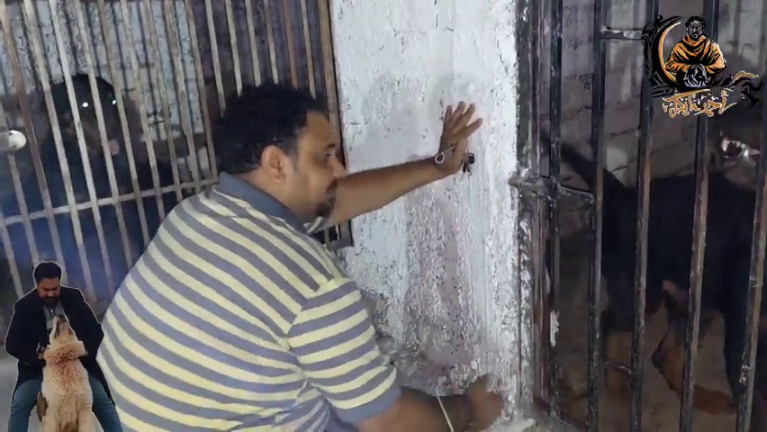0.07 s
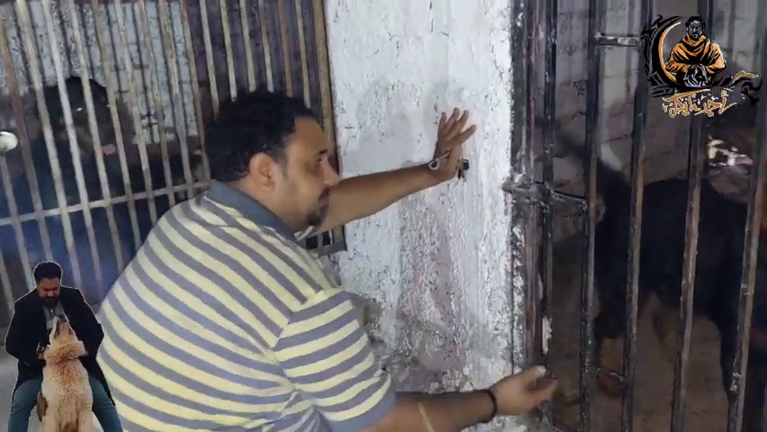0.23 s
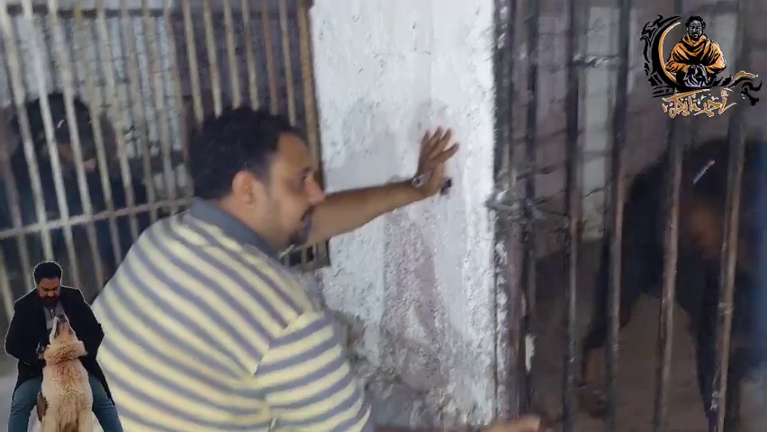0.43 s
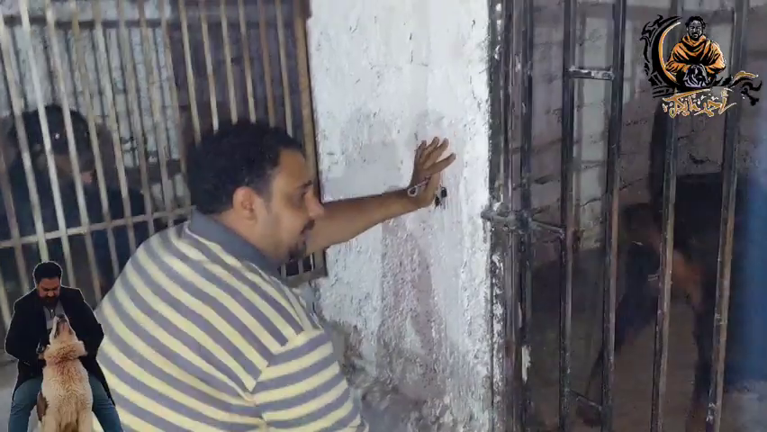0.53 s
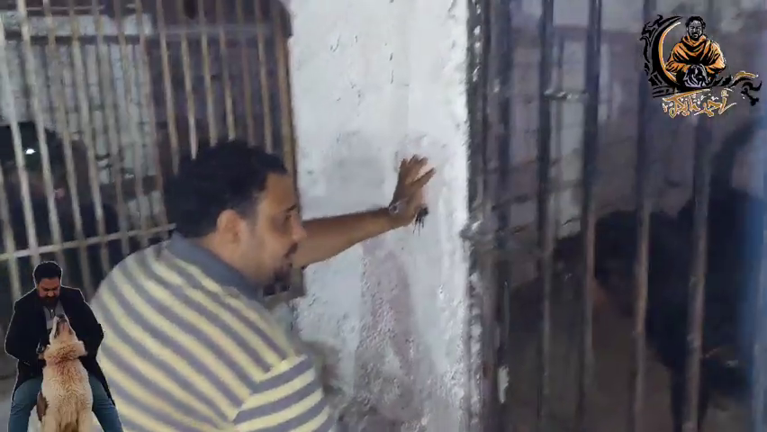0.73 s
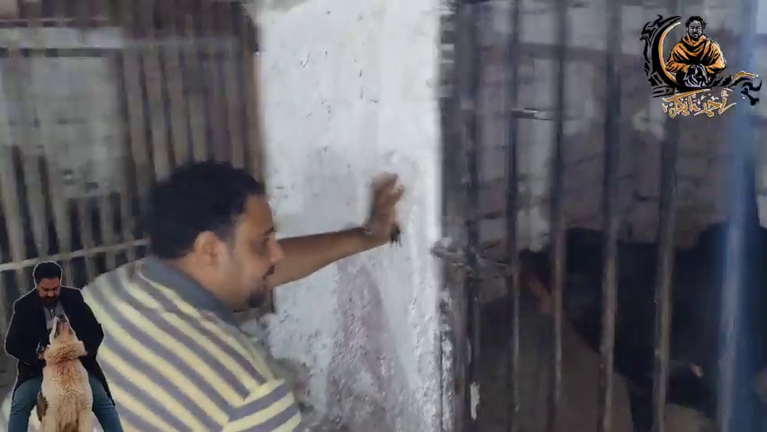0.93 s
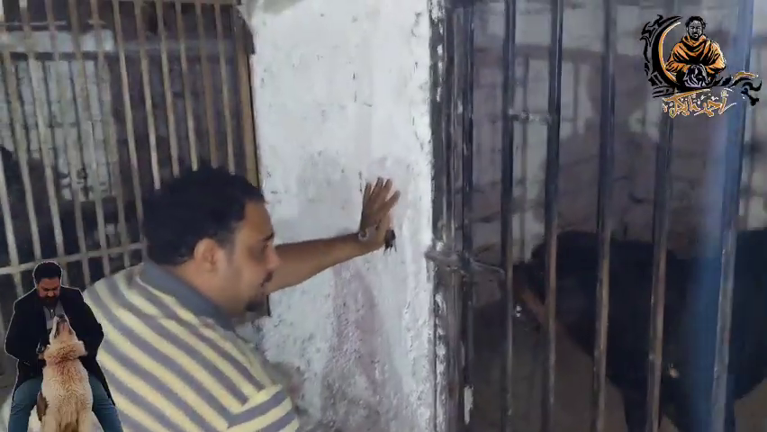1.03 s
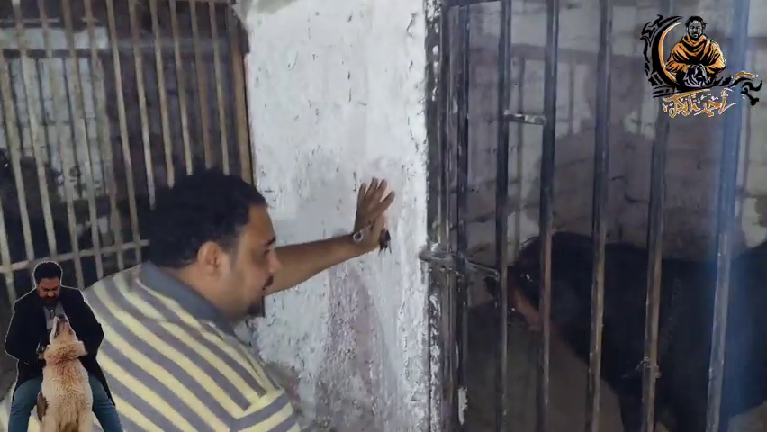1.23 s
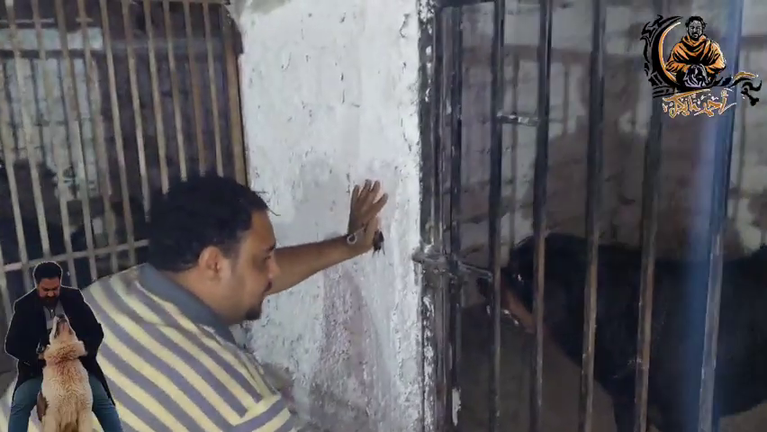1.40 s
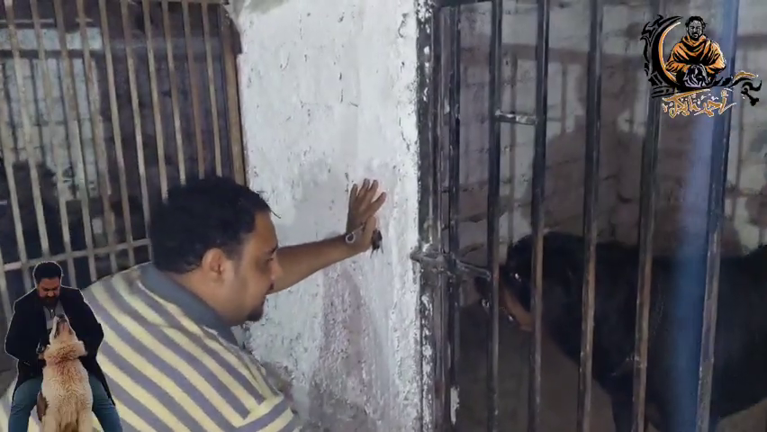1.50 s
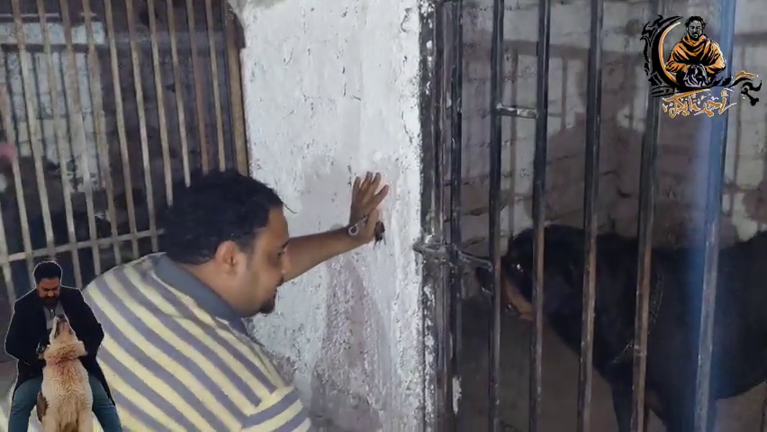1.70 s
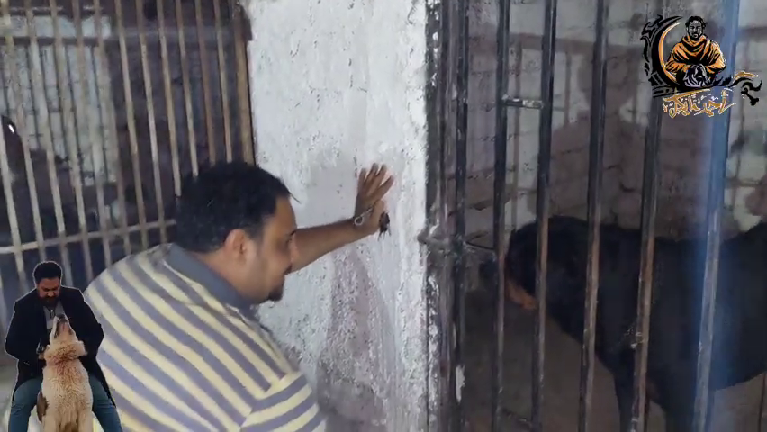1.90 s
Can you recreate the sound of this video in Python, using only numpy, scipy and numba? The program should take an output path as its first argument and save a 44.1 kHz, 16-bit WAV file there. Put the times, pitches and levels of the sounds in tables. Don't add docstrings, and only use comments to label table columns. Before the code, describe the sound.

Three loud, throaty barks from a large dog close by, at about 0.36, 0.6 and 0.87 seconds, each under a quarter second, ringing in a bare hard-walled kennel. Before them, distant dogs yelp over a low growl and a claw tap. Collar tags tinkle faintly between barks. A whistling pant comes near 1.15, a far bark around 1.3 to 1.5, then soft pants from 1.73 over quiet, sinking room rumble and phone hiss.

```python
import sys
import numpy as np
from scipy import signal
from scipy.io import wavfile
from scipy.ndimage import uniform_filter1d
from numba import njit

SR = 44100
rng = np.random.default_rng(int(sys.argv[2]) if len(sys.argv) > 2 else 0)


def gain_from_decibels(decibels):
    exponent = np.asarray(decibels, float) / 20
    return 10 ** exponent


def int16_out(signal):
    q = np.round(np.clip(np.atleast_2d(signal).T, -1, 1) * 32767)
    wavfile.write(sys.argv[1], SR, q.astype(np.int16))


N = 85995


def unit(x):
    return x / np.sqrt(np.mean(x ** 2) + 1e-30)


@njit
def svf(x, hz, width):
    y, b, l = np.empty(len(x)), 0., 0.
    for i in range(len(x)):
        g, k = np.tan(np.pi * hz[i] / SR), width / hz[i]
        v = (b + g * (x[i] - l)) / (1 + g * (g + k))
        b, l, y[i] = 2 * v - b, l + 2 * g * v, k * v
    return y


def band(x, hz, width):
    return svf(x + 1e-18, np.clip(hz + np.zeros(N), 20, .45 * SR), float(width))


def steep(x, hz, width):
    return band(band(x, hz, width), hz, 2 * width)


def filtered(x, order, hz, kind):
    return signal.sosfilt(signal.butter(order, hz, kind, fs=SR, output="sos"), x)


def curve(table, axis, edge=None):
    rows = np.array(table, float)
    return np.interp(np.arange(N) / SR, rows[:, 0], rows[:, axis], edge, edge)


def walk(rate_hz):
    k = int(SR / rate_hz)
    steps = np.repeat(rng.standard_normal(N // k + 1), k)
    return unit(uniform_filter1d(uniform_filter1d(steps, k), k)[:N])


# frequency in Hz, density in dB per Hz.
FLOOR = [(15, -41), (25, -25.5), (92, 3), (212, -7.5), (335, -2.5), (624, -33.5), (3620, -29.5),
         (5280, -32), (16000, -41.5)]
# time in seconds, level in dB.
FLOOR_DB = [(0, -40), (.3, -39), (1.0, -47), (1.4, -53), (1.5, -55.5), (1.68, -54), (1.76, -55),
            (1.89, -55.5), (1.95, -70)]
# time in seconds, level in dB.
HISS = [(0, -59), (.025, -61), (.3, -54), (1.0, -68.5), (1.38, -77), (1.45, -96), (1.6, -72.5), (1.88, -71),
        (1.95, -74)]


def floor():
    air, rows = 0, np.array(FLOOR)
    opposite = np.array([[1], [-1]])
    for hz in 30 * 2 ** np.arange(0, 9.2, .5):
        mid, side = (unit(band(band(rng.standard_normal(N), hz, hz / 1.2), hz, hz / 2.4)) for _ in range(2))
        density_db = np.interp(np.log(hz), np.log(rows[:, 0]), rows[:, 1])
        db = density_db + 10 * np.log10(hz) + 5.1 * walk(8.54)
        air = air + gain_from_decibels(db) * (mid + 0.54 * side * opposite)
    noise = rng.standard_normal((2, N))
    mid, side = (unit(band(v, 4700, 2500) + band(v, 16000, 9000)) for v in noise)
    hiss = gain_from_decibels(curve(HISS, axis=1) + 1.2 * walk(23)) * (mid + 0.19 * side * opposite)
    return unit(air) * gain_from_decibels(curve(FLOOR_DB, axis=1)) + hiss


def walls(x):
    bass_t60_s, treble_t60_s, treble_db = 0.5, .35, 3.5
    bass_width, treble_width = 0.31, 1
    age = np.arange(SR)[None] / SR
    noise = rng.standard_normal((2, SR))
    low = filtered(noise, 2, 1000, "low")

    def fade(t60_s):
        return np.minimum(age / 0.002, 1) * np.exp(-np.log(1000) * age / t60_s)

    bass = 2 * low * fade(bass_t60_s)
    treble = gain_from_decibels(treble_db) * (noise - low) * fade(treble_t60_s)
    mid = bass[0] + treble[0]
    side = bass_width * bass[1] + treble_width * treble[1]
    echo = np.array([mid + side, mid - side])
    return signal.fftconvolve(x[None], echo / np.sqrt(np.sum(mid ** 2)), axes=1)[:, :N]


# frequency in Hz, t60 in seconds, level in dB.
CELL = [(443.4, 0.19, -24), (522, 0.16, -15), (620, 0.26, -19), (820, 0.26, -13)]


def cell_modes(x):
    return sum(gain_from_decibels(db + 18) * band(x, hz, np.log(1000) / np.pi / t60_s) for hz, t60_s, db in CELL)


# time in seconds, level in dB, pitch in Hz, mouth resonance in Hz, chest in dB.
FAR_0 = [(0, -16, 423, 870, 3.5), (.022, -36.5, 422, 820, 6.5), (.045, -32, 453.2, 950, 0.5),
         (.1, -39, 321.8, 665, -6), (.125, -27.5, 331.2, 713, -8.5), (.155, -38.5, 330.9, 637, -6)]
FAR_1 = [(0.17, -28.5, 441.6, 660, -1), (0.198, -31.5, 343.9, 660, 12.5), (0.221, -15.5, 404.5, 788, -17),
         (0.257, -25.5, 450.5, 820, 11), (0.266, -19, 408.3, 750, -7.5), (0.31, -30.5, 365.4, 797, 7),
         (0.351, -23.5, 358, 700, -12)]
FAR_2 = [(1.273, -44, 270.7, 520, -15.5), (1.303, -36, 326.6, 633.4, 7), (1.331, -36, 387, 770, -14.5),
         (1.363, -29.5, 407, 731, 0), (1.418, -43.5, 386.1, 743, 6), (1.466, -50.5, 372.4, 800, 5.5),
         (1.52, -54.5, 358.2, 681, -2)]
FAR_3 = [(1.539, -54.5, 309.8, 620, 0.5), (1.6, -52.5, 289.3, 590, -9), (1.688, -56.5, 269.4, 530, -0.5)]


def neighbours():
    return dog([FAR_0, FAR_1, FAR_2, FAR_3], sub=(0.052, 0.191, 0.12, 0.37), jitter=0.024, shimmer_db=5.0,
               rough=(0.94, 0.95, 1.0, .2), breath_db=(3, -0.5, -1, -6.5), bright_db=(4, 21, 23, 8),
               second_db=(-9, -13.5, -8, -8), tooth_hz=(2300, 2290, 2130, 2200),
               tooth_db=(-18, -24.5, -16, -14.5))


# time in seconds, peak in dB.
CLAWS = [(.004, -35.5), (.124, -49), (0.17, -45), (0.588, -42.5), (1.186, -50), (1.382, -55), (1.592, -55),
         (1.736, -60.5), (1.755, -58.5), (1.774, -62)]


def claws():
    t, level = np.arange(N) / SR, 0
    for s, db in CLAWS:
        level = level + gain_from_decibels(db + 6) * (t > s) * np.exp(-np.clip(t - s, 0, None) / 0.0044)
    return band(rng.standard_normal(N) * level, 2000, 3500)


# time in seconds, peak in dB.
TAGS = [(0.3439, -36.5), (0.5853, -42.5), (0.707, -36.5), (0.7814, -44), (0.835, -47), (1.0564, -62),
        (1.1357, -48), (1.2725, -51)]


def tags():
    mode_hz, pair_hz, attack_s, t60_s = 7240, 7260, 0.0021, 0.073
    t, out = np.arange(N) / SR, 0
    for (s, db), turn in zip(TAGS, rng.random((len(TAGS), 2))):
        age = np.clip(t - s, 0, None)
        fade = (1 - np.exp(-age / attack_s)) * np.exp(-np.log(1000) * age / t60_s)
        ring = np.sin(2 * np.pi * (mode_hz * age + turn[0]))
        ring = ring + 0.5 * np.sin(2 * np.pi * (pair_hz * age + turn[1]))
        out = out + gain_from_decibels(db) * fade * ring
    return out


# start in seconds, length in seconds, top resonance in Hz, sag as a share, whistle in dB.
PANTS = [
    (1.143, 0.11, 2140, 0.012, 7.5),
    (1.73, 0.12, 2187, 0.1, -26.5),
    (1.838, 0.0687, 2030, 0.077, -12.5),
]
# level in dB, chest in dB.
PANT_DB = [(-38.5, -1), (-47, 7.5), (-56.5, 10)]
# frequency as a share of the top resonance, width in Hz, level in dB.
PANT_SHAPE = [(0.459, 70, -2), (.57, 121.6, 1.5), (.85, 151, -2), (1, 91.7, 7)]


def pants():
    t, out = np.arange(N) / SR, 0
    air = rng.standard_normal(N) * gain_from_decibels(3.8 * walk(60))
    for (s, length_s, top_hz, sag, whistle_db), (db, chest_db) in zip(PANTS, PANT_DB):
        part = np.clip((t - s) / length_s, 0, 1)
        shape = PANT_SHAPE + [(1.554, 260.0, whistle_db), (0.16, 50.5, chest_db)]
        hz = top_hz * (1 - sag * part)
        puff = sum(gain_from_decibels(d) * unit(steep(air, share * hz, width)) for share, width, d in shape)
        swell = np.minimum(part / 0.17, 1) ** 2 * (1 - part) ** 0.89
        out = out + gain_from_decibels(db) * swell * unit(puff)
    return out


# time in seconds, pitch in Hz, level in dB.
GROWL = [(0, 103.8, -42), (.09, 99, -41), (.125, 102, -52), (.24, 105, -36), (.31, 103, -35.5),
         (.34, 102.9, -28.5), (.37, 95.6, -42.5)]
RUMBLE = [(0.801, 101, -64), (0.849, 107.9, -41), (0.886, 123.7, -47)]
SIDE_TONE = [(.7, 620, -28), (.725, 600, -27), (.745, 534.7, -21), (.8, 546.7, -46), (.86, 546.4, -39.5),
             (0.89, 519, -23.5), (.965, 520.5, -17.5), (1.0, 509, -27), (1.03, 512.3, -38.5),
             (1.12, 514.6, -41)]


def growl():
    out = 0
    for table in (GROWL, RUMBLE, SIDE_TONE):
        hz = curve(table, axis=1) * (1 + 0.021 * walk(31.7))
        phase = 2 * np.pi * np.cumsum(hz) / SR
        level = uniform_filter1d(gain_from_decibels(curve(table, axis=2, edge=-120.) + 3.2 * walk(45)), size=400)
        out = out + level * (np.sqrt(2) * np.sin(phase) + .08 * np.sin(2 * phase))
    return out


@njit
def folds(hz, sub, stretch, size):
    pulses, phase, p, k = np.zeros(len(hz) + 1), np.empty(len(hz)), 0., 0
    for i in range(len(hz)):
        step = hz[i] * stretch[k] / SR
        p += step
        if p >= 1:
            p, k = p - 1, k + 1
            s = size[k] * (1 - sub[i] * (k % 2))
            pulses[i] += s * p / step
            pulses[i + 1] += s * (1 - p / step)
        phase[i] = p
    return pulses[:-1], phase


# frequency in Hz, width in Hz, level in dB.
THROAT = [(600, 78, -5), (951, 285, -13.5), (1214, 112, -11), (1940, 234, -22), (2116, 45, -24.5),
          (2282, 67, -29)]
# frequency in Hz, width in Hz, level in dB.
BREATH = [(5070, 1200, -31), (6700, 1100, -43), (11400, 6400, -44)]


def dog(calls, sub, jitter, shimmer_db, rough, breath_db, bright_db, second_db, tooth_hz, tooth_db):
    rows = [r for call in calls for r in call]
    effort = uniform_filter1d(sum(gain_from_decibels(curve(c, axis=1, edge=-120.)) for c in calls), size=130)

    def each(values):
        return sum(v * (curve(c, axis=2, edge=0.) > 0) for c, v in zip(calls, values))

    pitch_hz, mouth_hz, chest_db = (curve(rows, axis=k) for k in (2, 3, 4))
    chance = rng.standard_normal((N // 40, 2)).T
    stretch = np.clip(1 + jitter * chance[0], .5, 2)
    wavering_hz = pitch_hz * (1 + .015 * walk(60))
    pulses, phase = folds(wavering_hz, np.clip(each(sub), 0, 1), stretch, gain_from_decibels(shimmer_db * chance[1]))
    puff = np.exp(-phase / 1.2) * rng.standard_normal(N)
    source = unit(band(pulses, 450, 1400)) + each(rough) * unit(band(puff, 900, 1600))

    voice = steep(source, mouth_hz, 162) + gain_from_decibels(chest_db) * steep(source, pitch_hz, 161)
    second = steep(source, 1602 + (mouth_hz - 760), 180)
    voice = voice - gain_from_decibels(each(second_db) + 3.5 * walk(23.14)) * second
    bright = each(bright_db)
    for hz, width, db in THROAT:
        lift_db = bright * np.clip((hz - 1500) / 700, 0, 1)
        voice = voice + gain_from_decibels(db + 4.65 * walk(25) + lift_db) * steep(source, hz, width)
    voice = filtered(filtered(voice, 4, 212, "high"), 6, 2290, "low")

    hiss = (0.44 + np.exp(-phase / 0.25)) * rng.standard_normal(N)
    teeth = 0
    for hz, width, db in BREATH:
        jet = unit(steep(hiss, hz * (1 + .03 * walk(15)), width))
        teeth = teeth + gain_from_decibels(db + each(breath_db) + 4.2 * walk(40)) * jet
    tooth = unit(steep(hiss, np.maximum(each(tooth_hz), 1800), 270))
    teeth = teeth + gain_from_decibels(each(tooth_db) + 1.5 * walk(40)) * tooth
    return effort * unit(voice) + uniform_filter1d(effort, size=900) * teeth


# time in seconds, level in dB, pitch in Hz, mouth resonance in Hz, chest in dB.
BARK_1 = [(.36, -12, 317.4, 683, -3), (.368, -11.5, 319.2, 696, -4.5), (.382, -8.5, 259.9, 733, -6.5),
          (.402, -9.5, 306, 680, -6.5), (.425, -7, 364.1, 764, -13), (.445, -6, 344.5, 712, -17),
          (.482, -10.5, 396.3, 793, -10), (.503, -12, 329.1, 780, -9), (.535, -19, 358.7, 700, -1.5),
          (.548, -29, 337.1, 657, 2.5)]
BARK_2 = [(0.6, -26, 313.6, 820, -12), (0.61, -11, 304.3, 780, -16), (0.632, -8, 322.1, 800, -11.5),
          (0.659, -7.5, 389.5, 730, -13), (0.692, -10.5, 400.5, 792, -12),
          (0.707, -13.5, 374.2, 640.4, -7.5), (0.739, -14, 341.1, 887, -4.5), (0.755, -19, 332, 812, 7.5),
          (0.776, -26, 324.3, 626, -5)]
BARK_3 = [(0.864, -32.5, 319.6, 820, 0), (0.882, -12, 290.7, 823.2, -8), (0.901, -8.5, 321.3, 827, -6),
          (0.931, -10, 356.4, 701, -5), (0.964, -10.5, 360.7, 722.7, -1.5), (0.994, -20, 353.2, 803, 6.5),
          (1.01, -15, 319.9, 825, -8.5), (1.023, -22.5, 311.3, 798, 2), (1.045, -25, 387.8, 755, -7.5)]


def big_dog():
    return dog([BARK_1, BARK_2, BARK_3], sub=(.15, .35, .3), jitter=.03, shimmer_db=3.0,
               rough=(.55, .6, .45), breath_db=(.7, .7, -3), bright_db=(.1, .1, .1),
               second_db=(-12, -9, -13), tooth_hz=(3400, 3450, 3150), tooth_db=(-33, -34, -30))


def scene():
    port_lag_s, port_top_hz, balance_db = 0.00012, 5260, -0.64
    near_wet_db, far_wet_db = -15, -8
    near, far = big_dog(), neighbours()
    small = tags() + pants() + claws()
    direct = 0.81 * near + 0.68 * far + cell_modes(near + far) + small + growl()
    room = walls(gain_from_decibels(near_wet_db) * near + 0.21 * small + gain_from_decibels(far_wet_db) * far)
    low = signal.sosfiltfilt(signal.butter(4, port_top_hz, fs=SR, output="sos"), direct)
    late = direct - low + np.interp(np.arange(N) - port_lag_s * SR, np.arange(N), low)
    balance = gain_from_decibels(np.array([[balance_db / 2], [-balance_db / 2]]))
    return (np.array([late, direct]) + room) * balance + floor()


def low_pass(x):
    return signal.sosfilt(signal.butter(12, 15810, fs=SR, output="sos"), x)


def record(dry):
    mix = np.tanh(0.96 * dry) / 0.84
    return low_pass(mix)


dry = scene()
out = record(dry)
int16_out(out)
```